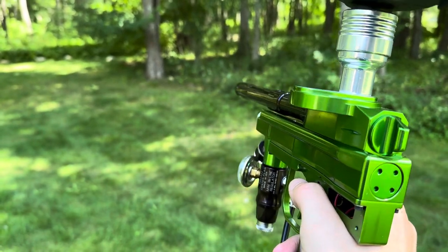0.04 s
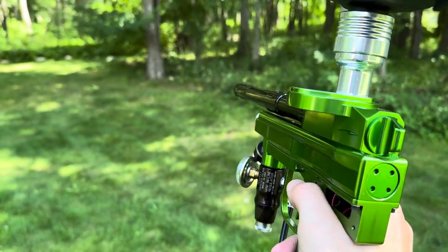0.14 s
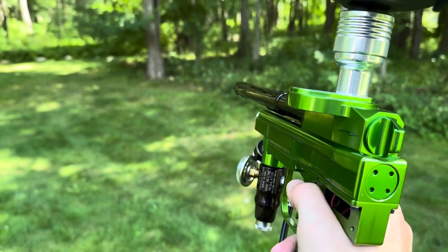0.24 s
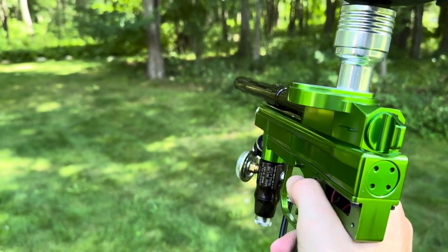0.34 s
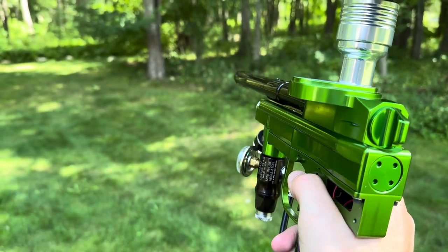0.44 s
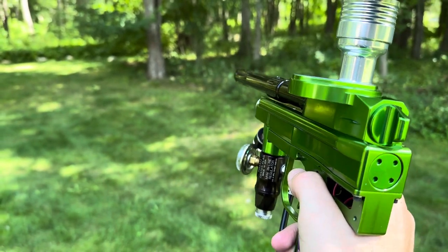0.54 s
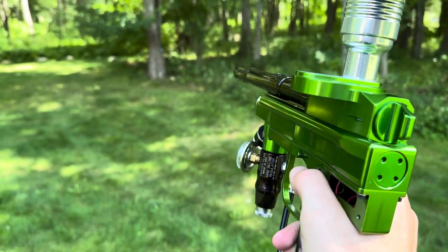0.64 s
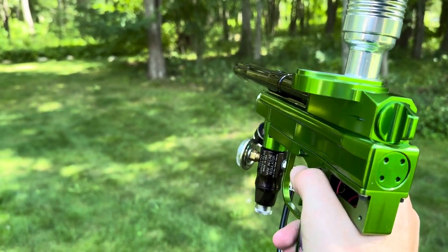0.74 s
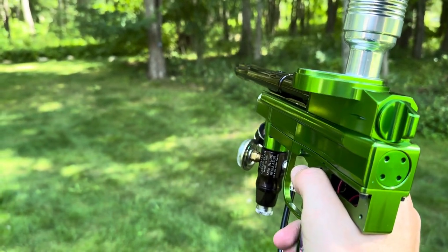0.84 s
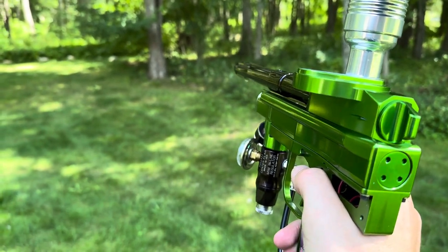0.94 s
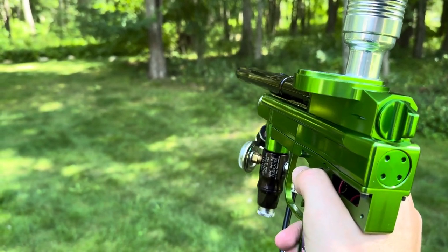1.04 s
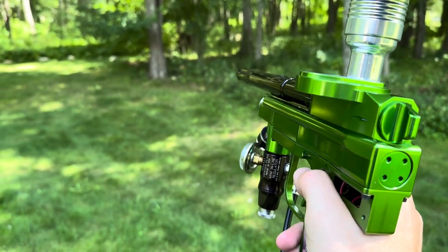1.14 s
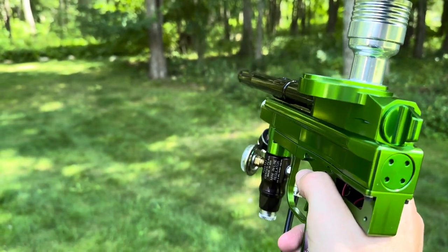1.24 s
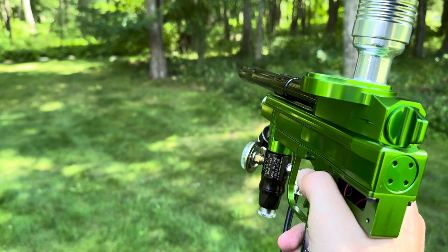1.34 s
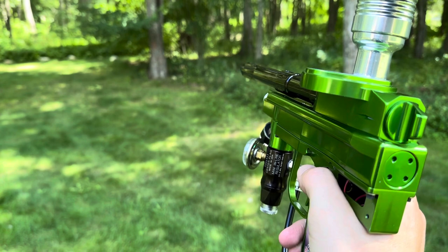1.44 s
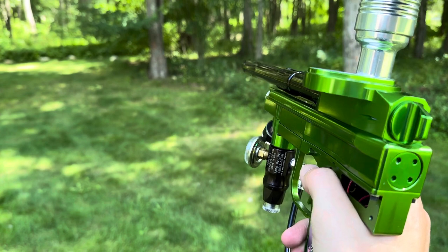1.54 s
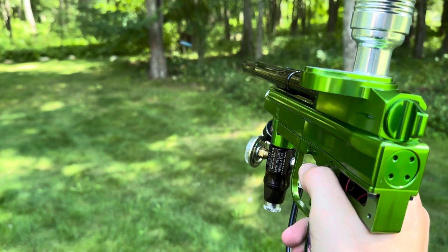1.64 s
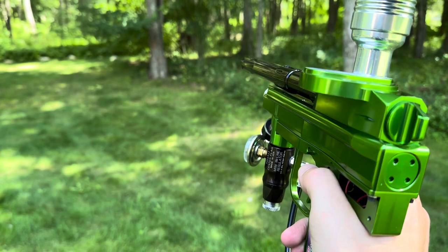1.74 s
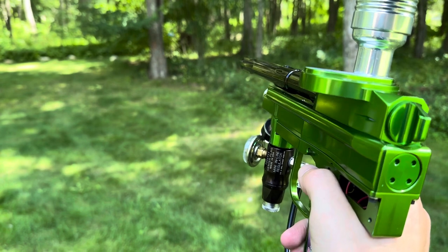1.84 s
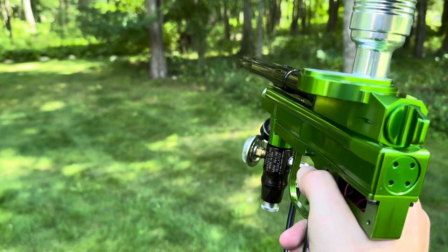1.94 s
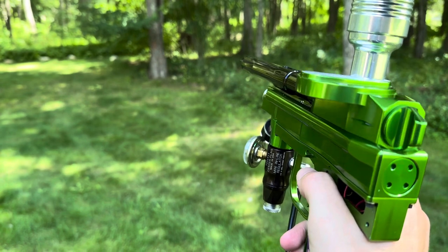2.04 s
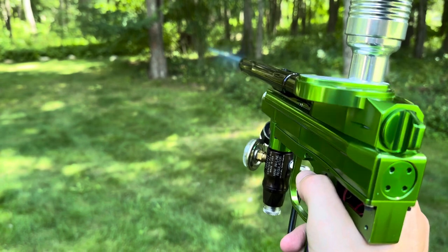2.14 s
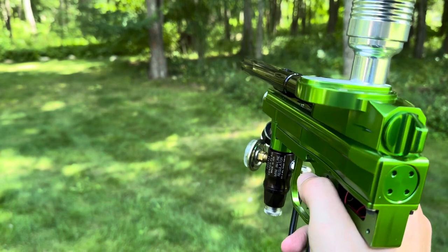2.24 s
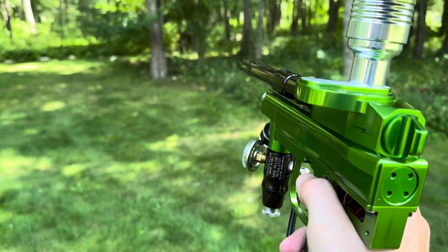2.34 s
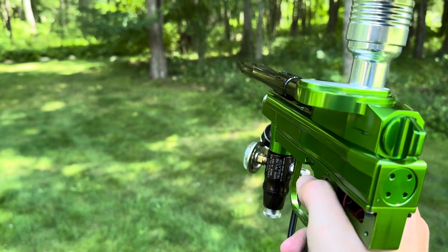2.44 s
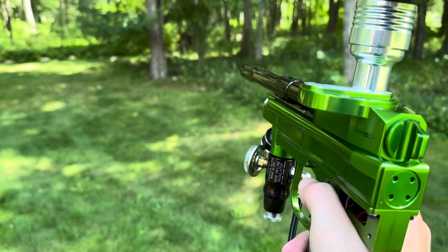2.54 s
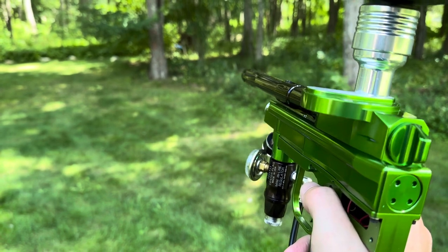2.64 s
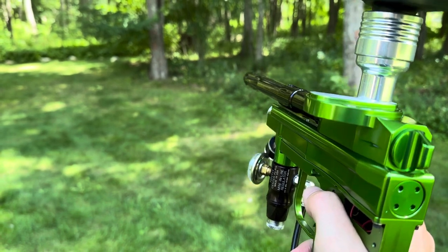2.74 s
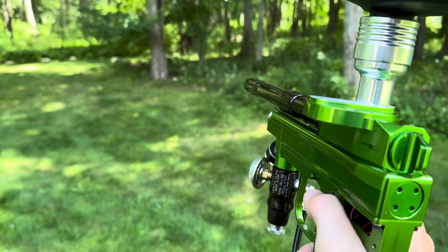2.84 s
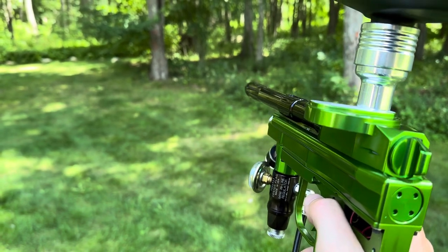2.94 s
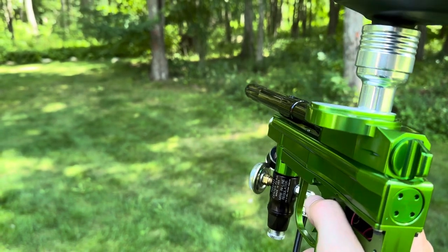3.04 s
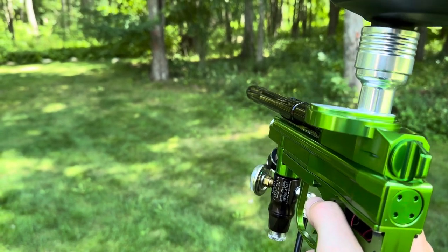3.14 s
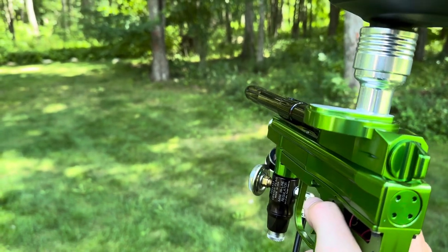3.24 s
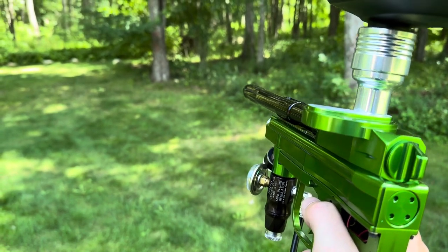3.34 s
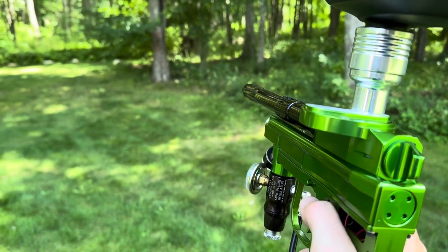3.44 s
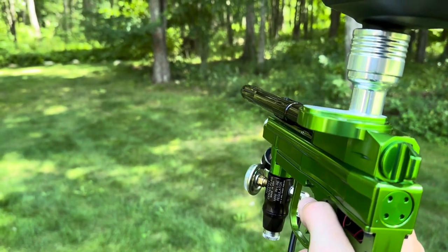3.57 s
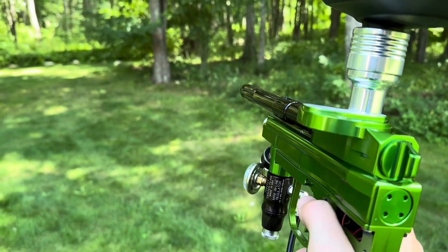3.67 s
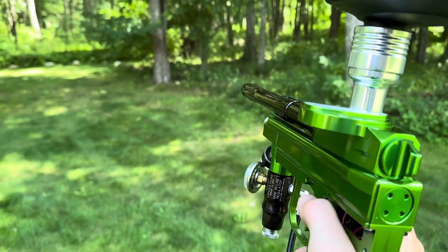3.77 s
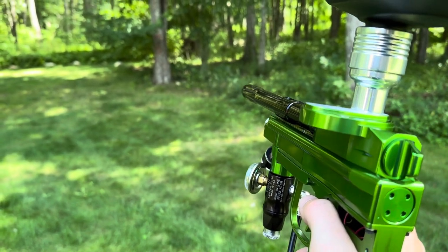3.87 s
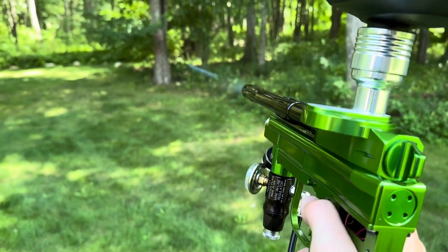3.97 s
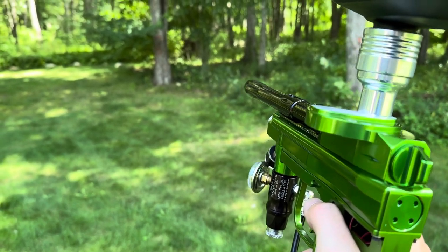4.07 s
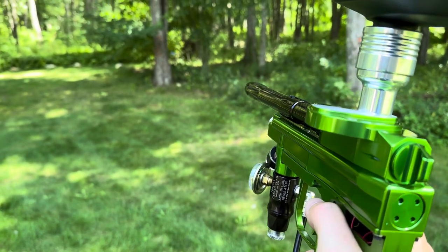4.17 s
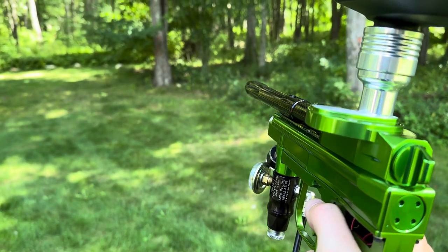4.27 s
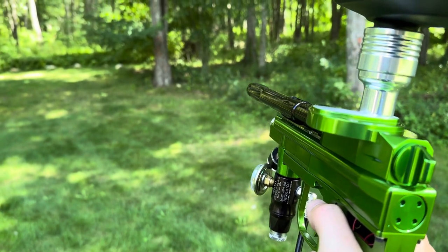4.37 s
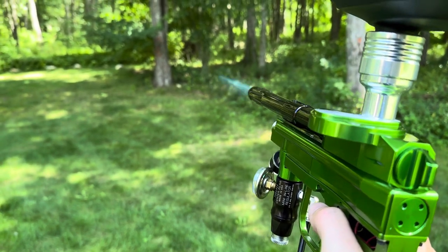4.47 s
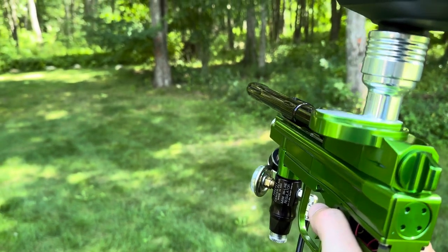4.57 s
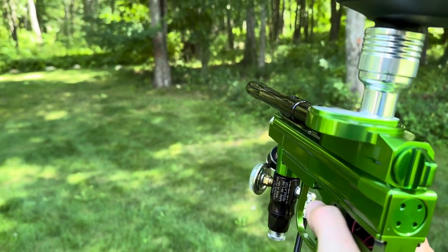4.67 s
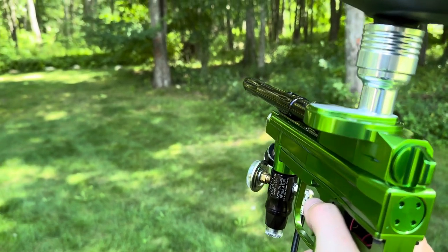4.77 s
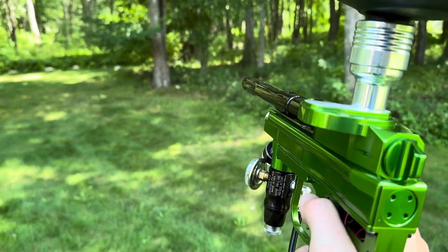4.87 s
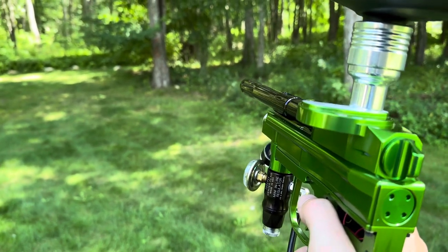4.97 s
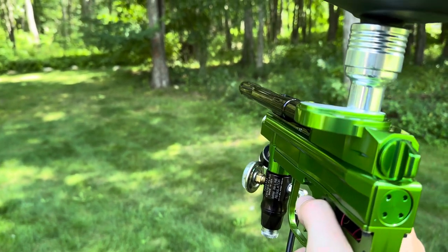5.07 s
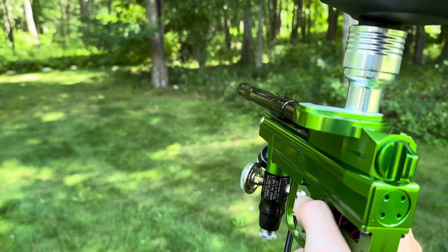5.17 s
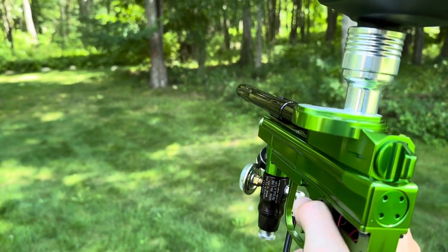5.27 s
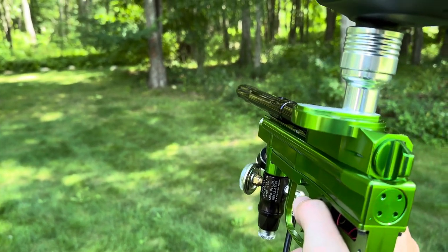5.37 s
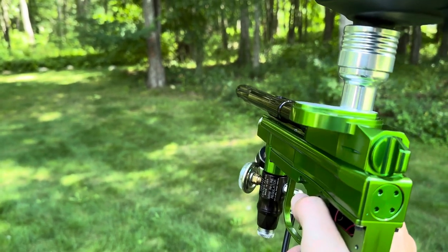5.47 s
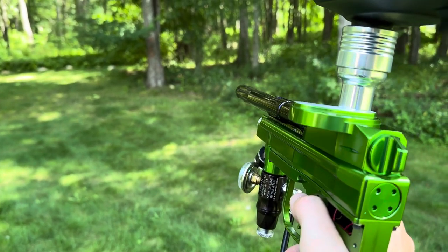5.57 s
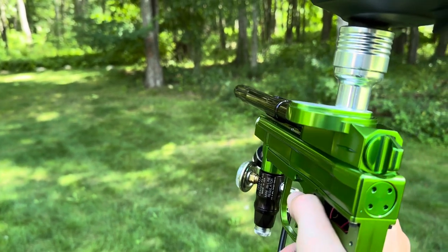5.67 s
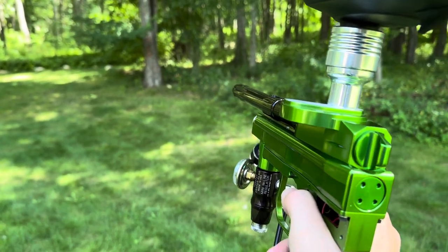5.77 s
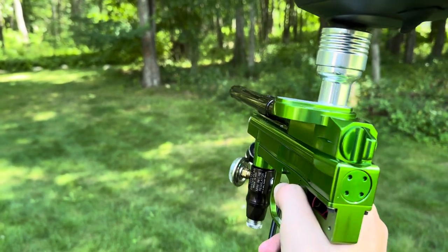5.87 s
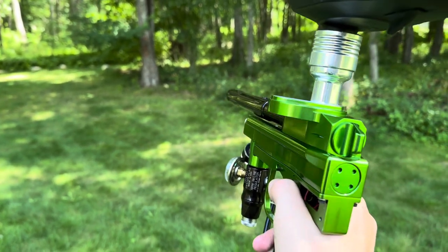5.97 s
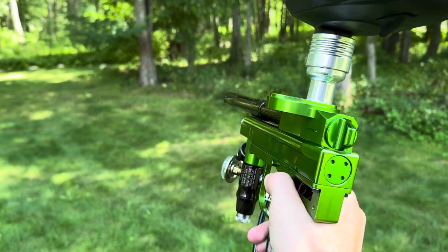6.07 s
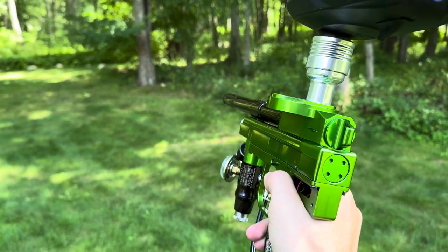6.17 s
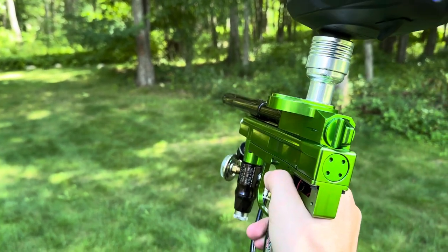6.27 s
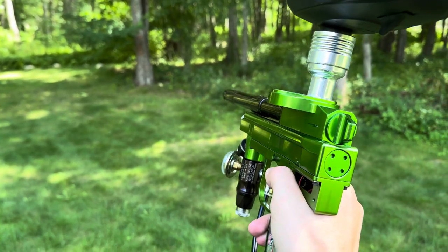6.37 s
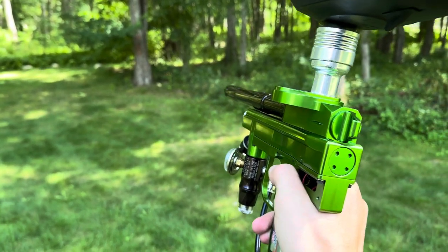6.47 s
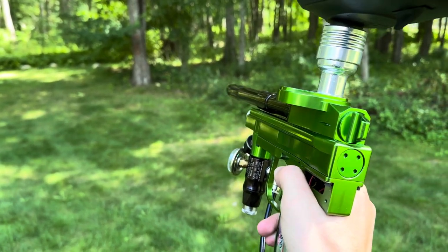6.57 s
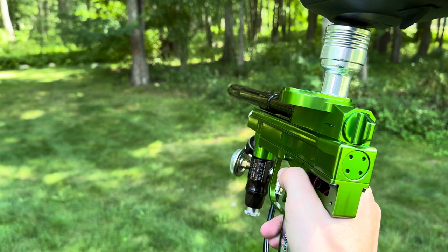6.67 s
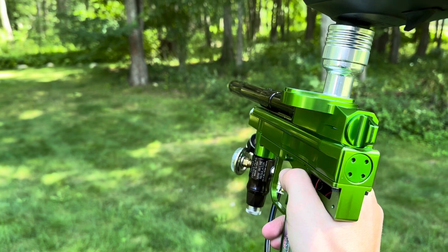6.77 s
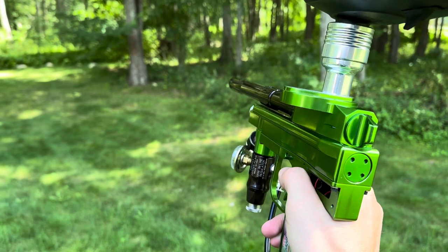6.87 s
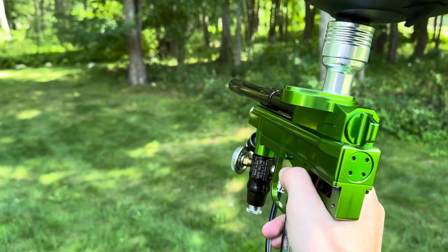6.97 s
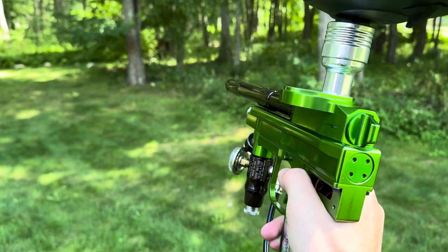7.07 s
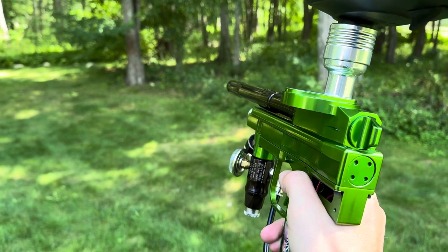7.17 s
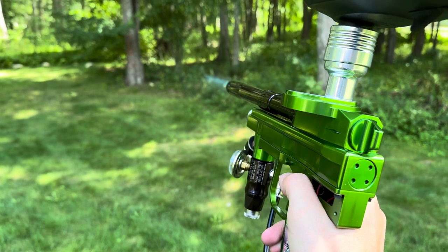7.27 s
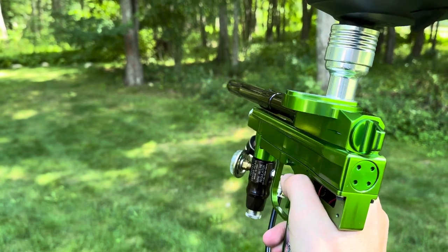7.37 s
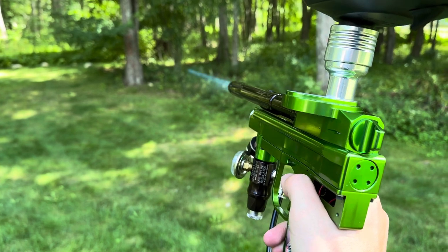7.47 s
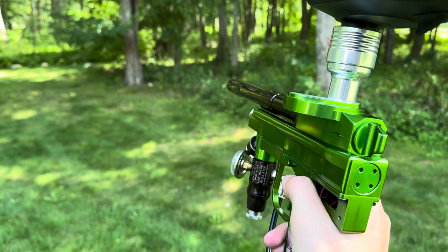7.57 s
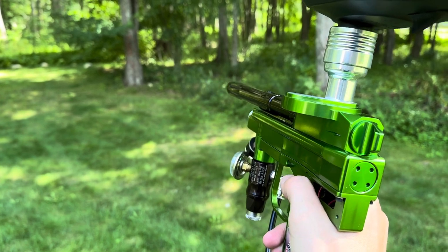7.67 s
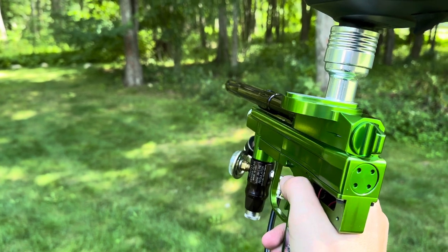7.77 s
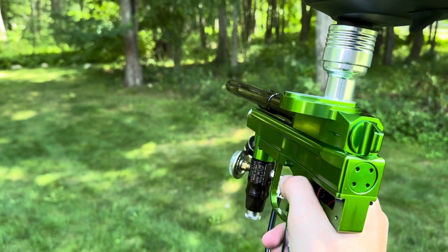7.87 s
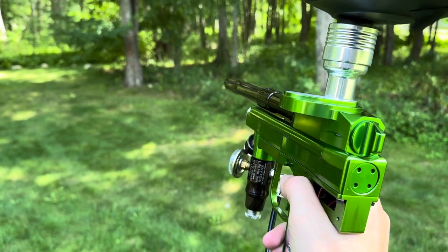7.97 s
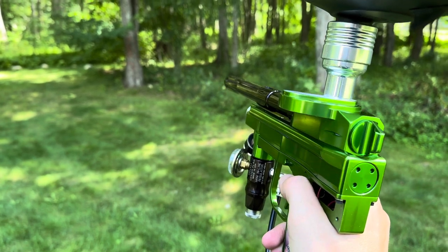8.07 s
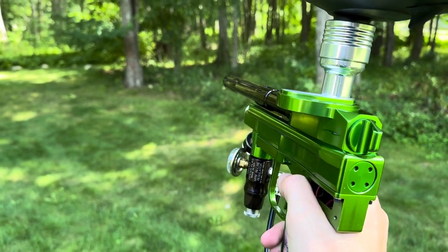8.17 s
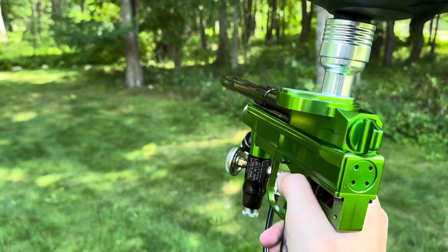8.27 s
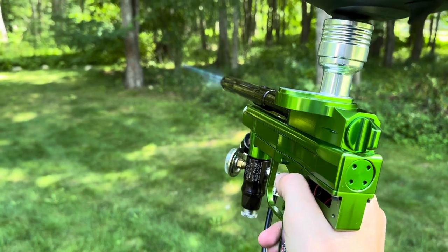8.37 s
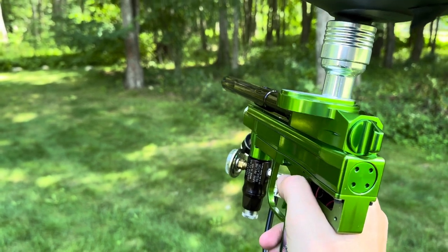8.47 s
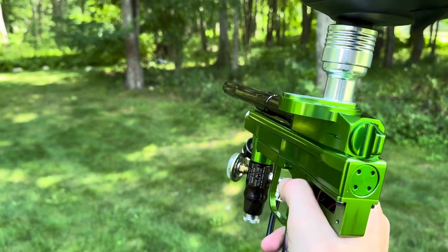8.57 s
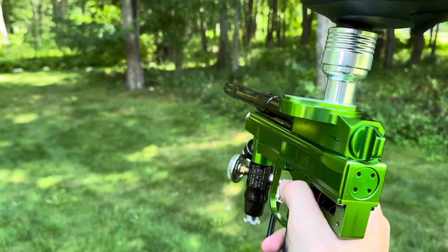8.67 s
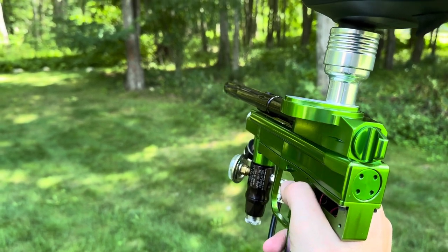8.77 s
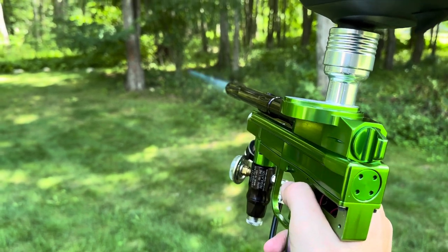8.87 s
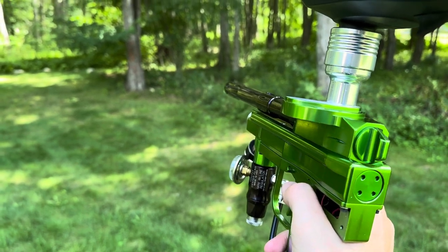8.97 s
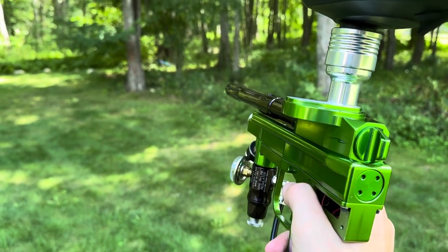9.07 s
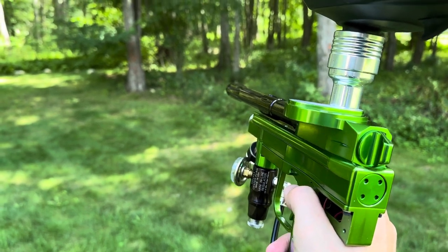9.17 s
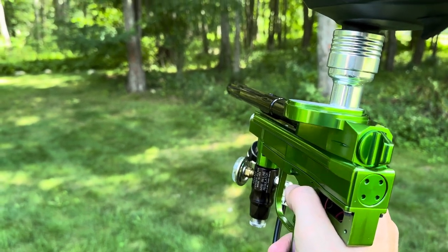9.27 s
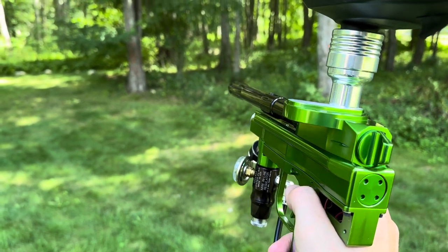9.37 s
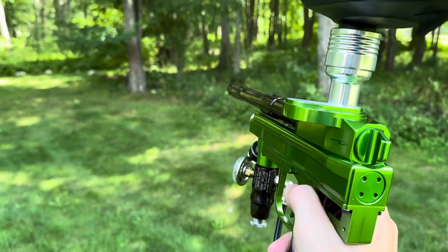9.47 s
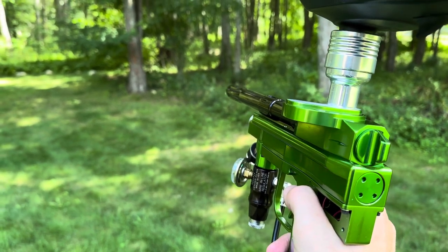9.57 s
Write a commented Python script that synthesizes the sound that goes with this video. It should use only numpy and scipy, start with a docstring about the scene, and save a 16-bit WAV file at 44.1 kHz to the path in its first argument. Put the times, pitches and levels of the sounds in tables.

```python
"""An air-powered paintball marker fires strings of shots on a lawn, close to a stereo microphone.
In each shot the valve clicks, the bolt (a moving plug) slides, air thumps and cracks out of the barrel,
and the bolt slams back. Balls knock in the loader; soft splats and sharp ticks, likely hits on trees,
follow. Trunks scatter an echo. Far traffic rumbles, insects hiss, leaves rustle, air puffs on the mic."""
import sys
import numpy as np
from scipy import signal
from scipy.fft import rfft, irfft, next_fast_len
from scipy.io import wavfile
from scipy.ndimage import map_coordinates

SR = 44100
rng = np.random.default_rng(int(sys.argv[2]) if len(sys.argv) > 2 else 0)


def wav_out(sig):
    """Save sig, one row per channel (or a flat mono array), as 16-bit PCM at SR to the path in sys.argv[1]."""
    wavfile.write(sys.argv[1], SR, np.round(np.clip(np.atleast_2d(sig).T, -1, 1) * 32767).astype(np.int16))


N = 424241
TIME = np.arange(N) / SR


def amp(db):
    return 10 ** (np.asarray(db) / 20)


def look_up(table, hz, column=1):
    """Reads between a table's rows on a log pitch scale."""
    columns = np.transpose(table)
    return np.interp(np.log(hz + 1), np.log(columns[0] + 1), columns[column])


def filtered(sound, response):
    """Changes each pitch's strength and timing by response(hz)."""
    size = next_fast_len(N + SR // 2)
    return irfft(rfft(sound, size) * response(np.fft.rfftfreq(size, 1 / SR)), size)[..., :N]


def resonances(modes, hz):
    """How a body favours the pitches it rings at."""
    return sum(amp(db) * 1j * hz * width / (pitch ** 2 - hz ** 2 + 1j * hz * width)
               for pitch, width, db in modes)


def dull(hz, above_hz):
    """A soft contact: the treble falls away steeply."""
    return 1 / (1 + 1j * hz / (0.37 * above_hz) - (hz / above_hz) ** 2) ** 2


def add(track, start_s, sound):
    """Mixes a sound into a track."""
    room = track[..., round(start_s * SR):][..., :sound.shape[-1]]
    room += sound[..., :room.shape[-1]]


def burst(table, length_s, rise_s, size=64):
    """Two unrelated noises; each pitch drops 60 dB in its own fade time."""
    hz, t, bands = signal.stft(rng.standard_normal((2, round(length_s * SR))), SR, nperseg=size)
    colour = amp(look_up(table, hz))[:, None]
    fade = amp(-60 * t / look_up(table, hz, column=2)[:, None])
    noise = signal.istft(bands * colour * fade, SR, nperseg=size)[1]
    attack = 1 - np.exp(-np.arange(noise.shape[1]) / SR / rise_s)
    return noise * attack / np.sqrt(np.mean(colour ** 2))


def wobble(rate):
    """A smooth curve through rate random points a second."""
    return map_coordinates(rng.standard_normal(int(N * rate / SR) + 4), [TIME * rate])


def rush(colour):
    """Two unrelated steady noises of strength 1."""
    noise = filtered(rng.standard_normal((2, N)), lambda hz: amp(look_up(colour, hz)))
    return noise / np.sqrt(np.mean(noise ** 2))


# Tone of traffic and of insects: (pitch [Hz], level [dB]). Levels in all tables are relative.
TRAFFIC_TONE = [(12, -57.5), (20, -33), (54, 4), (118, -6), (187, -3.5), (254, -20.5), (306, -14),
                (730, -37), (793, -30.5), (1670, -31), (2140, -35), (2800, -42), (3640, -76.5),
                (6160, -120)]
INSECT_TONE = [(1470, -61), (2500, -30.5), (3870, -4.5), (4180, -8), (4750, -3.5), (6870, -5), (8450, -8.5),
               (9500, -29), (12400, -61), (20900, -120)]
# Their slow swells: (time [s], traffic level [dB], insect level [dB])
LAWN_LEVELS = [(0, -75.5, -73), (.5, -68, -74.5), (3.199, -71.5, -74), (3.899, -71.5, -74),
               (5.2, -72.5, -72), (6.1, -67.5, -72.5), (6.7, -67, -71.5), (9.62, -67, -68)]
# Swells of the leaves: (time [s], level [dB])
LEAF_LEVELS = [(0, -91.5), (5.9, -82.5), (6.1, -77), (6.4, -82.5), (9.62, -79.5)]

def lawn():
    """Far traffic, insects and leaves: three noises that waver in loudness."""
    times, traffic_db, insect_db = np.transpose(LAWN_LEVELS)
    traffic = amp(np.interp(TIME, times, traffic_db) + 2.2 * wobble(8.5)) * rush(TRAFFIC_TONE)
    insects = amp(np.interp(TIME, times, insect_db) + 2 + .7 * wobble(2.4)) * rush(INSECT_TONE)
    leaf_db = np.interp(TIME, *np.transpose(LEAF_LEVELS)) + 2.8 * wobble(20)
    leaves = amp(leaf_db) * rush([(200, -34.5), (600, -.5), (2000, -3), (5000, -3), (9000, -39)])
    return traffic * [[1], [2.5]] + insects * [[1], [1.5]] + leaves  # a louder second row sounds wider


# A shot just before the start, still echoing: (time [s], thump level [dB])
EARLY_SHOT = (-0.27, 0)
# The echo from the trees: (pitch [Hz], level [dB], fade time [s])
ECHO_TONE = [(40, -7.5, .8), (199.5, -4, 0.98), (345, -5, 0.74), (398, 8, 0.76), (455, -5, 0.8),
             (700, -9, .9), (1047, 1, 0.77), (1430, -7.5, .8), (1698, -5.5, .9), (1960, -11, 0.8),
             (2346, -5, .8), (3126, -12.5, 0.96), (6900, -20.5, 1), (10000, -19.5, .5), (12500, -21.5, .35),
             (16000, -25, .3)]

def tree_echo():
    """Each shot comes back from the trunks as a dying wash that swells and dips."""
    out = np.zeros((2, N + SR))  # a spare second in front holds the early shot
    for at, thump_db, *_ in [EARLY_SHOT, *SHOTS]:
        wash = burst(ECHO_TONE, 1.1, rise_s=.028, size=1024)
        flutter_db = 2.8 * map_coordinates(rng.standard_normal(200), [np.arange(wash.shape[1]) / SR * 70])
        add(out, at + 1, amp(thump_db - 42 + flutter_db) * wash)
    return out[:, SR:]


VALVE_LEAD_S, BOLT_RETURN_S = .0179, .0422  # click before the thump, slam after it
# The shots: (time [s], thump level [dB], deep push level [dB], bolt slam level [dB])
SHOTS = [(0.6059, 1.34, -0.7, -21), (0.8056, 2.95, 1, -18.5), (1.269, 1.2, -1.5, -18),
         (1.4729, 1.5, 0.35, -18.5), (1.6634, 3, -1, -18.5), (1.8197, 2, -0.2, -19), (1.987, 2.5, 0.1, -20),
         (2.1426, 1.8, -0.3, -19.5), (2.307, 1.5, 5, -19.5), (2.468, 0.9, 0.3, -21.5),
         (2.6257, 1.3, 0.9, -20), (3.9692, 0.3, -0.1, -21.5), (4.178, 2, 0.1, -19.5),
         (4.4759, 2.55, -2.5, -20.5), (4.6904, 2.4, -0.6, -18.8), (6.7457, 2.36, 0.3, -19.5),
         (6.9403, 1, 1, -19), (7.1147, 2, 1.3, -19.5), (7.278, 2, -0.6, -19), (7.4732, 1.1, 3.5, -19),
         (7.6833, 0.9, -0.2, -19), (7.8893, 0.85, 0.1, -19.5), (8.0406, 1, 0, -19.5),
         (8.205, 0.5, 1.3, -18.5), (8.3747, 0.9, 7, -19), (8.5596, 2, -0.5, -19), (8.7164, 0.9, 4.5, -20),
         (8.875, -0.1, 1, -19), (9.0622, 0.8, -0.3, -20), (9.2403, 0.8, 0.6, -19.5)]
# Notes of the body around the valve: (pitch [Hz], width [Hz], level [dB])
VALVE_NOTES = [(323, 53, 0), (630, 270, 1.5), (1400, 160, -6), (1770, 450, 3)]
# Air slipping past the bolt: (pitch [Hz], level [dB])
SLIDE_TONE = [(300, -11.5), (1000, -1), (2500, 2), (4000, -1), (8000, -8.5), (16000, -4.5)]
# The sliding bolt snags: (time before the thump [ms], level [dB])
BOLT_SNAGS = [(14, -33), (8, -35)]

def valve_and_bolt():
    """The valve clicks open; the bolt slides in a hiss of air, then returns and knocks the same body."""
    knocks, air = np.zeros((2, N))
    out = np.zeros((2, N))
    speeding_up_db = np.linspace(-6, 0, round(VALVE_LEAD_S * SR))
    for at, _, _, bolt_db in SHOTS:
        valve_db = rng.normal(-17.5, .3)
        opens = at - VALVE_LEAD_S
        add(air, opens - .005, np.full(round(.013 * SR), amp(valve_db - 26)))  # air opens the valve
        knocks[round((opens + .0007) * SR)] = amp(valve_db + 32.5)
        add(air, opens, amp(valve_db - 14.5 + speeding_up_db))
        for before_ms, db in BOLT_SNAGS:
            add(out, at - before_ms / 1000, amp(db) * burst(TICK_TONE, .012, rise_s=.00033))
        add(air, at, np.full(round(BOLT_RETURN_S * SR), amp(bolt_db - 22)))  # spent air leaks out
        knocks[round((at + BOLT_RETURN_S) * SR)] = amp(bolt_db + 20)
    out[0] += filtered(knocks, lambda hz: resonances(VALVE_NOTES, hz) * dull(hz, 2700))
    return out + air * amp(3 * wobble(250)) * rush(SLIDE_TONE)


# Low notes of the barrel, the first two being the deep push: (pitch [Hz], width [Hz], level [dB])
BARREL_NOTES = [(68, 16, 26), (100.6, 55, 34), (262.5, 79.7, 36.5), (389.8, 29, 35.5), (730.6, 160, 28.5),
                (896.5, 47, 31), (1133, 76, 27.5)]

def barrel_thump():
    """One push of air per shot sets the barrel's low notes ringing."""
    pushes, out = np.zeros((2, 2, N))
    for at, thump_db, deep_db, _ in SHOTS:
        pushes[:, round(at * SR)] = amp([deep_db, thump_db])
    for push, notes in zip(pushes, [BARREL_NOTES[:2], BARREL_NOTES[2:]]):
        out[0] += filtered(push, lambda hz: resonances(notes, hz) * dull(hz, 1700))
    return out


SURGE_GAP_S, SURGE_SWING_DB = .0062, 3.5
# Notes of the tube as air rushes through: (pitch [Hz], width [Hz], level [dB])
TUBE_NOTES = [(870, 180, 2), (1085, 66, -1.5), (1670, 140, -1.5), (2410, 410, -1.5), (2647, 110, -7.5),
              (3570, 240, -11)]
# The air's crack, and the snap as its first surge returns: (pitch [Hz], level [dB], fade time [s])
CRACK_TONE = [(300, -32, .08), (735, 1.5, 0.05), (1500, -0.5, 0.063), (2930, -5, 0.04), (4850, -13.5, .04),
              (8900, 1, 0.025), (16000, 0, 0.018)]
SNAP_TONE = [(500, -5, 0.026), (900, 2, 0.023), (2500, 2.5, 0.011), (5000, -3.5, 0.0044),
             (16010, -15, 0.0082)]

def air_crack():
    """The ball uncorks the barrel; air escapes in surges and rings the tube and the metal."""
    def surging(air):
        cycles = (np.arange(air.shape[1]) / SR - .0015) / SURGE_GAP_S
        return air * amp(SURGE_SWING_DB * (np.cos(2 * np.pi * cycles) - 1))

    out, tube_air = np.zeros((2, 2, N))
    air_left = 1 / (1 + np.exp((TIME[:SR // 25] - .021) / .0013))  # the charge runs out
    for at, thump_db, *_ in SHOTS:
        db = thump_db + rng.normal(-16.5, 1.62)
        add(out, at - .001, amp(db + 10) * surging(burst(CRACK_TONE, .1, rise_s=.0026)))
        add(out[0], at, amp(db - 6) * metal_ring())
        add(out, at + .0002, amp(db + 5.5) * burst(SLAM_TONE, .0083, rise_s=.00016))  # the uncorking
        flow = burst([(500, 0, .18), (5000, 0, .068)], .05, rise_s=.0004)[:, :len(air_left)]
        add(tube_air, at + .002, amp(db + 7.5) * surging(flow * air_left))
        add(out, at + SURGE_GAP_S, amp(db + 3) * burst(SNAP_TONE, .02, rise_s=.00049))
    return out + filtered(tube_air, lambda hz: resonances(TUBE_NOTES, hz))


LONGEST_RING_S = .04  # cap on each note's fade time
# Notes of the metal body: (pitch [Hz], level [dB], fade time before the cap [s])
METAL_NOTES = [(1929, -8, 0.004), (2760, -16, 0.088), (3280, -13.5, 0.045), (3620, -5.5, 0.038),
               (4447, -19, 5.0), (5000, -19.5, 0.031), (6437, -11.5, 0.033), (6620, -6.5, 0.014),
               (6650, -22, 0.1), (7980, -4.5, 0.085), (8300, -13, 0.064), (10520, -12, 0.051),
               (10630, -12, 0.018), (11550, -24.5, 0.068)]

def metal_ring():
    """Each note of the metal body is a brief ping, at a new strength after each blow."""
    t = TIME[:SR // 10]
    return sum(amp(db + rng.normal(0, 4) - 60 * t / min(fade, LONGEST_RING_S)) * np.sin(2 * np.pi * hz * t)
               for hz, db, fade in METAL_NOTES)


# The bolt's slam, and the air let out with it: (pitch [Hz], level [dB], fade time [s])
SLAM_TONE = [(202.5, -7.5, 0.03), (700, -12.5, 0.035), (1500, -8.5, .04), (2340, -13.5, 0.04),
             (3750, 0, 0.018), (6400, -4, 0.014), (9000, -3.5, 0.015), (16000, -6.5, 0.0084)]
VENT_TONE = [(3000, -13.5, .3), (8000, -3, .3), (12690, -7.5, 0.26), (16000, -9.5, .25)]

def bolt_slam():
    """The bolt slams back, rings the metal and bounces once while air hisses out."""
    out = np.zeros((2, N))
    for at, _, _, db in SHOTS:
        back = at + BOLT_RETURN_S
        add(out, back, amp(db + 8) * burst(SLAM_TONE, .07, rise_s=.0002))
        add(out[0], back, amp(db - 9.5) * metal_ring())
        add(out, back, amp(db - 30) * burst(VENT_TONE, .2, rise_s=.005))
        bounce = amp(db + rng.normal(-7.5, 2.7)) * burst(SLAM_TONE, .05, rise_s=.00022)
        add(out, back + rng.normal(.0062, .00081), bounce)
    return out


# Single knocks of balls in the loader: (time [s], level [dB])
BALL_KNOCKS = [(0.954, -26.5), (1.017, -21.5), (1.054, -24.5), (2.875, -28), (2.949, -32), (4.122, -26.5),
               (4.415, -21.5), (5.229, -40), (5.29, -29), (5.31, -36), (5.325, -39), (7.644, -19),
               (8.952, -10), (8.97, -15), (9.512, -22), (9.562, -24), (9.596, -27)]
# Notes of its plastic shell: (pitch [Hz], width [Hz], level [dB])
LOADER_NOTES = [(403, 32, 5.5), (1010, 90, 1.5), (1140, 100, 1.5), (1440, 300, -3), (1700, 120, -4),
                (2440, 840, -1.5)]

def loader_rattle():
    """Balls knock in the plastic loader as they feed down; its notes also give trunk hits a hollow ring."""
    hits = [(at + .0044, db - 11) for at, db in TRUNK_HITS] + list(BALL_KNOCKS)
    for at, *_ in SHOTS:
        for wait in .072 + rng.exponential(.062, size=9):
            hits.append((at + wait, rng.normal(-22.5, 5.5) - 55 * wait))  # later ones are softer
    blows = np.zeros((2, N))
    fade = amp(-60 * TIME[:400] / .019)
    for at, db in hits:
        add(blows, at, amp(db) * fade * rng.standard_normal((2, 400)))  # a rough contact
    return filtered(blows, lambda hz: resonances(LOADER_NOTES, hz) * dull(hz, 3000))


# The loudest splats: (time [s], level [dB])
LOUD_SPLATS = [(0.697, -35), (7.372, -31), (7.559, -30), (8.806, -30.5), (8.963, -27), (9.336, -34)]
# One splat: (pitch [Hz], level [dB], fade time [s])
SPLAT_TONE = [(200, -18.5, .08), (500, -2.5, 0.087), (1191, 5, 0.061), (2977, -0.5, 0.08), (8000, -8, 0.07),
              (16000, -18.5, .04)]

def far_splats():
    """A soft burst follows each shot: the ball breaking, or the tree line answering."""
    out = np.zeros((2, N))
    soft_splats = [(at + rng.normal(.087, .004), rng.normal(-41.5, 6)) for at, *_ in SHOTS]
    for at, db in [*LOUD_SPLATS, *soft_splats]:
        add(out, at, amp(db) * burst(SPLAT_TONE, .049, rise_s=.0047))
    return out


# Sharp ticks, about 0.19 s after a shot: (time [s], level [dB])
TRUNK_HITS = [(0.7913, -21), (0.9916, -22), (1.457, -22.5), (2.0107, -24.5), (2.173, -18.5),
              (2.3305, -14.5), (2.4981, -21), (2.6574, -15.5), (2.8135, -22.5), (4.1565, -21.5),
              (4.3715, -22), (4.6673, -17.5), (4.8774, -19.5), (7.1364, -16.5), (7.3139, -17),
              (8.0732, -17), (8.2312, -20.5), (8.3918, -22), (8.7408, -26), (8.906, -16), (9.428, -20.5)]
# A tick, and its echo from nearby things: (pitch [Hz], level [dB], fade time [s])
TICK_TONE = [(300, -13.5, 0.026), (1000, -11.5, .04), (2958, 2.5, 0.01), (7000, -3, 0.011),
             (15830, -1, 0.0083)]
TICK_ECHO_TONE = [(500, -21.5, .2), (2000, -3.5, 0.21), (6000, 1, 0.14), (16000, -8.5, 0.082)]

def trunk_hits():
    """A sharp tick, probably the ball striking a tree, with a short echo."""
    out = np.zeros((2, N))
    for at, db in TRUNK_HITS:
        add(out, at, amp(db) * burst(TICK_TONE, .11, rise_s=.00027))
        add(out, at, amp(db - 18) * burst(TICK_ECHO_TONE, .26, rise_s=.012))
    return out


# Puffs of air: (time [s], length [s], level [dB])
AIR_PUFFS = [(0.901, 0.18, -54), (2.229, .12, -46), (2.571, .15, -46), (7.593, 0.31, -49.5)]

def air_puffs():
    """Moving air hits the microphone with a brief, deep rumble."""
    swell = sum(amp(db) * np.exp(-(2 * (TIME - at) / length) ** 2) for at, length, db in AIR_PUFFS)
    return swell * rush([(15, -33.5), (35, 0), (60, 2.5), (110, -28.5), (200, -59.5)])


# The two microphone openings: (pitch [Hz], left minus right [dB], left lead [rad], likeness [0-1])
MIC_OPENINGS = [(40, -2, 0, 1), (500, -5, -.5, .97), (700, -12, 0, .75), (1250, 1, -1.3, .85),
                (1600, -4, -3.1, .6), (1950, -6, -6.3, .5), (2350, -4, -9.4, .4), (3000, -3, -10.5, .3),
                (3700, -7, -12.6, .4), (5500, -4, -12.6, .45), (6500, 0, -13.1, .85), (7300, -2, -12.9, .6),
                (8300, -1, -11.6, .93), (9000, 0, -10.3, .98), (9800, 0, -9.5, 1), (10500, 0, -8.8, .98),
                (11300, 0, -7.4, .75), (12300, 0, -6.3, 1), (13800, 0, -4.9, .88), (15000, 0, -3.2, 1)]

def stereo(pair, spread=1.0):
    """Both sides share the first row, the second sets them apart; spread scales their level gap."""
    def blend(hz):
        angle = np.arccos(np.clip(look_up(MIC_OPENINGS, hz, column=3), 0, 1)) / 2
        return [np.cos(angle), np.sin(angle)]

    def left_and_right(hz):
        level = amp(look_up(MIC_OPENINGS, hz) * [[spread], [0]])
        return level * np.exp(.5j * look_up(MIC_OPENINGS, hz, column=2) * [[1], [-1]])

    mid, side = filtered(pair, blend)
    return filtered(np.array([mid + side, mid - side]), left_and_right)


def scene():
    """The marker close by, with the outdoors more evenly balanced around it."""
    outdoors = lawn() + tree_echo()
    shots = valve_and_bolt() + barrel_thump() + air_crack() + bolt_slam()
    after_shots = loader_rattle() + far_splats() + trunk_hits()
    return stereo(shots + after_shots) + stereo(outdoors + air_puffs(), spread=.49)


CEILING, TOP_HZ = .95, 16800
# How strongly the microphone hears each pitch: (pitch [Hz], level [dB])
MIC_TONE = [(20, -11.5), (45, 1.5), (8000, -0.5), (9800, 3), (11300, -6.5), (12600, -0.5), (14200, -6.5),
            (15600, 4.5), (16100, -13.5), (16800, -24.5)]

def record(dry):
    """The microphone colours the sound; its filters delay the bass, so each thump glides down."""
    lag = lambda hz: 12 * np.arctan(hz / 74.3) + 6 * np.arctan(hz / 279)
    coloured = filtered(dry, lambda hz: amp(look_up(MIC_TONE, hz)) * np.exp(-1j * lag(hz)))
    rounded = coloured / (1 + np.abs(coloured / CEILING) ** 8) ** (1 / 8)  # softens the tallest peaks
    return filtered(rounded, lambda hz: hz < TOP_HZ)


dry = scene()
out = record(dry)
wav_out(out)
```